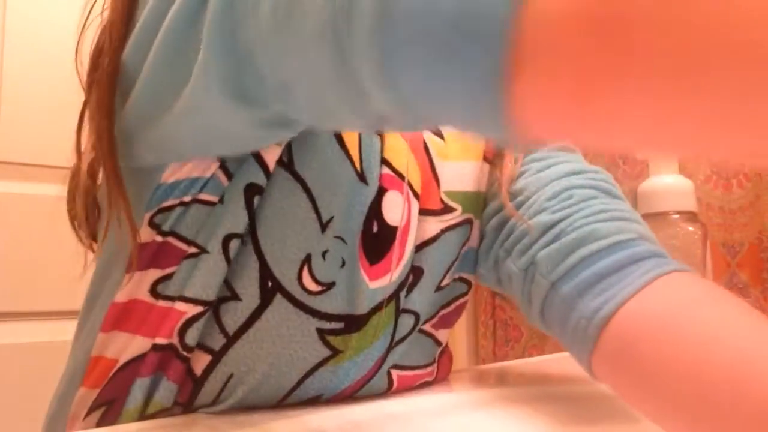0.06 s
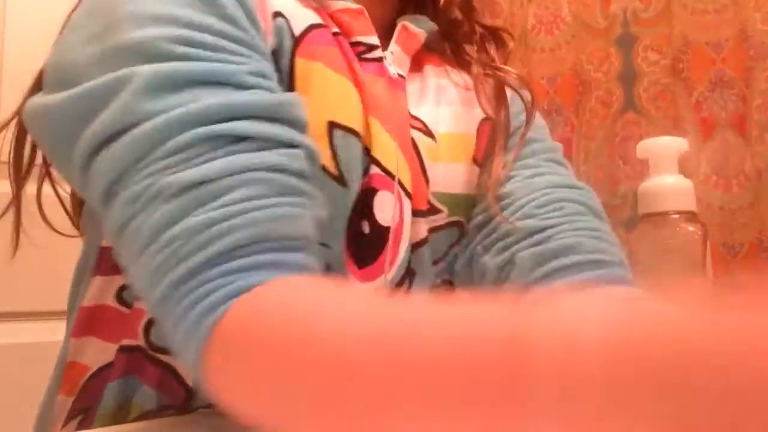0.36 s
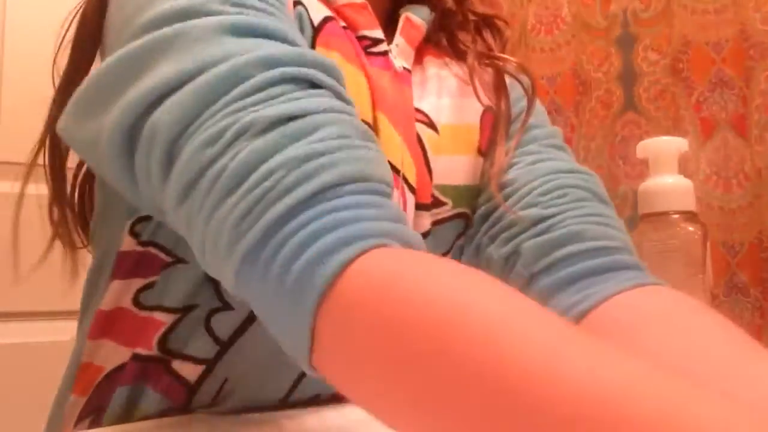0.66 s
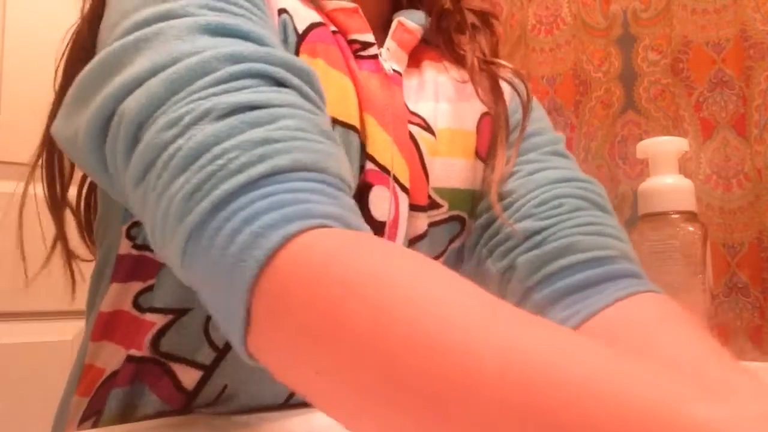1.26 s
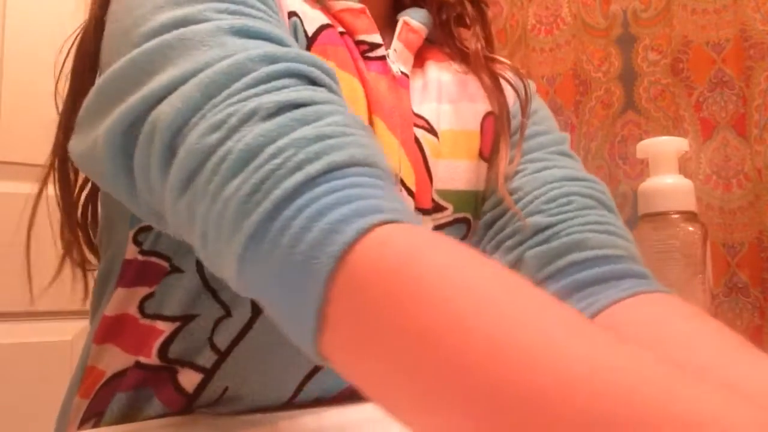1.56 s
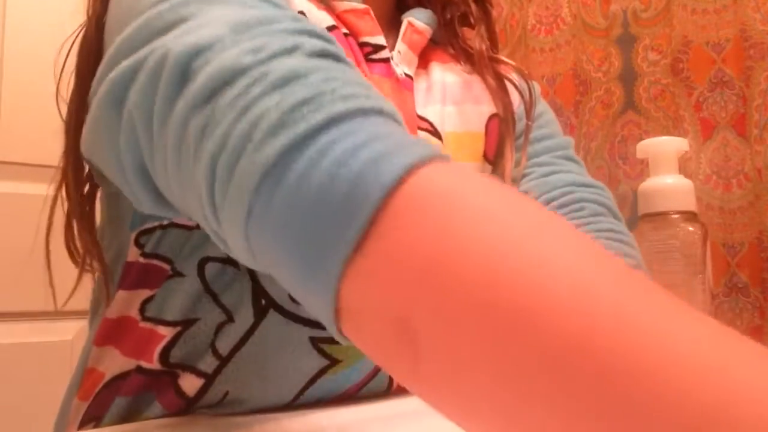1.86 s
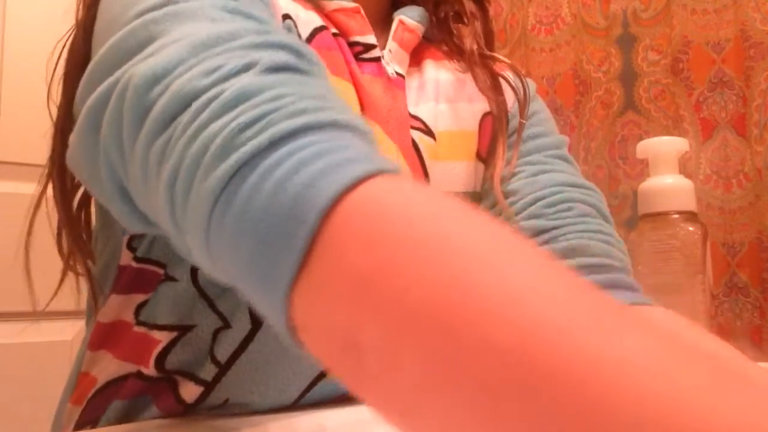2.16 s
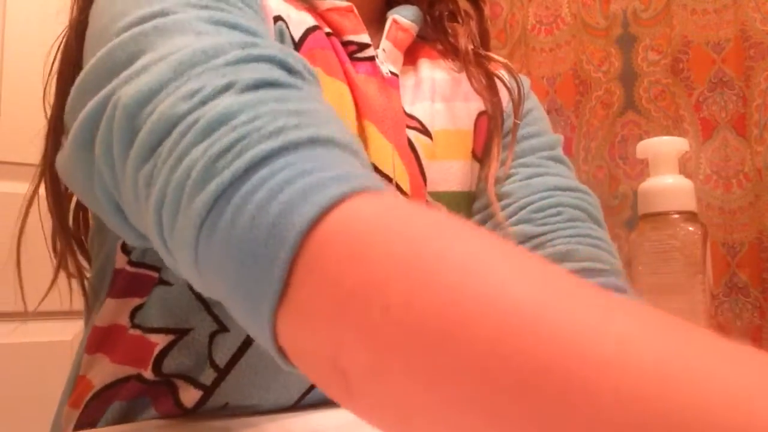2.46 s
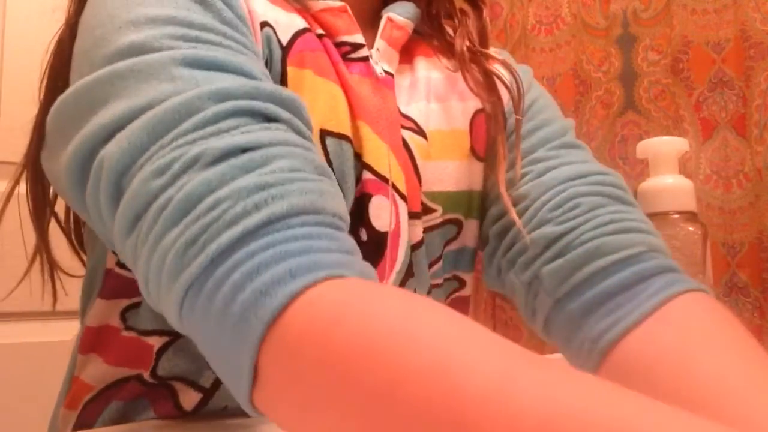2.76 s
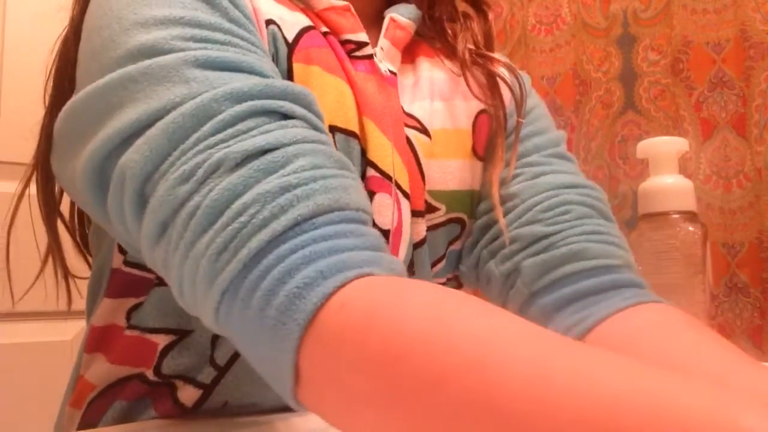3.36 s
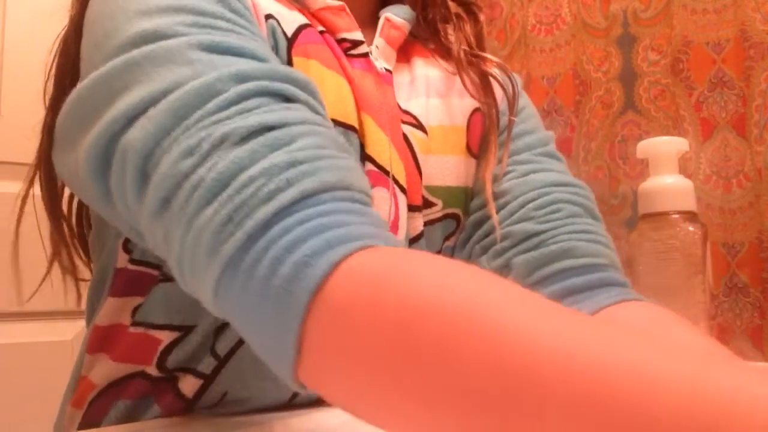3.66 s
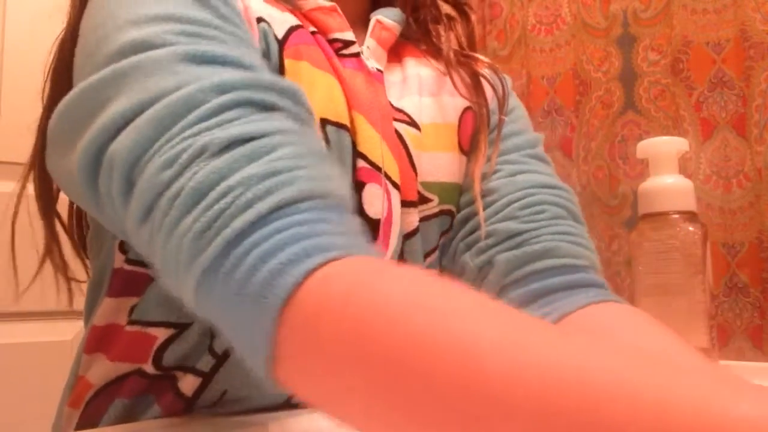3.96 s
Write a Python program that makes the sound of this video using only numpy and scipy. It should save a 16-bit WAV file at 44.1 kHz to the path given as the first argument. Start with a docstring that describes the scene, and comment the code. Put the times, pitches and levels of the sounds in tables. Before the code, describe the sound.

Water runs steadily from a tap into a sink, splashing off rinsing hands.

```python
"""Rinsing hands under a tap.

An aerated jet hisses and fizzes steadily into a bathroom sink. The water drums on the basin,
stirs hollow resonances in the bowl and gurgles at the drain; small bubbles ring. The hands throw
spray, brief spurts and splashes, and dump water that thuds. A small hard room, heard in mono."""
import sys
import numpy as np
from scipy import signal
from scipy.fft import rfft, irfft
from scipy.io import wavfile

SR = 44100
rng = np.random.default_rng(int(sys.argv[2]) if len(sys.argv) > 2 else 0)


def transcribe(signal):
    """Save signal, clipped to [-1, 1], as a 16-bit WAV file at the path in sys.argv[1]."""
    frames = np.atleast_2d(signal).T
    limited = np.clip(frames, -1, 1)
    pcm = np.round(limited * 32767).astype(np.int16)
    wavfile.write(sys.argv[1], SR, pcm)


N = 176400
T = np.arange(N) / SR
HZ = np.maximum(np.fft.rfftfreq(N, 1 / SR), 1)


def from_db(db):
    """Decibels to gain."""
    return 10 ** (np.asarray(db) / 20)


def unit_rms(x):
    """Scale to rms 1."""
    return x / np.sqrt(np.mean(x ** 2) + 1e-20)


def level(rows):
    """Gain curve from (time [s], level [dB]) points."""
    return from_db(np.interp(T, *np.transpose(rows)))


def colour(x, spectrum):
    """Apply a spectrum, falling 12 dB/octave below its first point; rms 1."""
    hz, db = np.transpose(spectrum)
    gain = from_db(np.interp(np.log(HZ), np.log(hz), db)) * np.minimum(HZ / hz[0], 1) ** 2
    return unit_rms(irfft(rfft(x) * gain, N))


def drift(rate_hz):
    """Slow random wander; rms 1."""
    return unit_rms(irfft(rfft(rng.standard_normal(N)) / (1 + (HZ / rate_hz) ** 2), N))


def patter(per_s, spread_db):
    """Random impacts of uneven size; rms 1."""
    sizes = from_db(spread_db * np.minimum(rng.exponential(1, N), 5)) * rng.choice([-1, 1], N)
    return unit_rms(sizes * (rng.random(N) < per_s / SR)) + 1e-18


def resonate(x, hz, width_hz):
    """Two-pole resonance; rms 1."""
    r = np.exp(-np.pi * width_hz / SR)
    return unit_rms(signal.lfilter([1, 0, -1], [1, -2 * r * np.cos(2 * np.pi * hz / SR), r * r], x))


def envelope(start_s, attack_s, hold_s, release_s):
    """Linear rise, hold, exponential fall."""
    rise = np.clip((T - start_s) / attack_s, 0, 1)
    return rise * np.exp(-np.maximum(T - start_s - attack_s - hold_s, 0) / release_s)


def high_pass(x, hz, order):
    """Butterworth low cut."""
    return signal.sosfilt(signal.butter(order, hz, "high", fs=SR, output="sos"), x)


def bathroom(x, t60_s=.3, wet_db=-10):
    """Direct sound plus the short dense tail of a hard room."""
    t = T[:SR // 2]
    tail = rng.standard_normal(len(t)) * from_db(-60 * t / t60_s) * (t > .003)
    wet = signal.fftconvolve(x, tail / np.linalg.norm(tail))[:N]
    return (x + from_db(wet_db) * wet) / np.hypot(1, from_db(wet_db))


# Room noise spectrum: (frequency [Hz], relative density [dB])
WASH_SPECTRUM = [(25, -46), (45, -32), (65, -13), (100, -14), (135, 2), (300, -4), (650, -2),
                 (1000, 3.5), (2000, -15.5)]

def room_wash(level_db=-54.5):
    """Steady low noise of the room."""
    return from_db(level_db) * colour(rng.standard_normal(N), WASH_SPECTRUM)


def faint_tone(hz=527, level_db=-46):
    """One brief tone near the start."""
    gain = from_db(level_db) * envelope(start_s=.16, attack_s=.035, hold_s=.085, release_s=.03)
    return gain * np.sin(2 * np.pi * hz * T)


# Force of the stream on the basin: (time [s], level [dB])
DRUM_LEVEL = [(0, -47.5), (.14, -52.5), (.3, -49.5), (.6, -52), (1.1, -50), (1.4, -52), (1.75, -45),
              (1.92, -54), (2.04, -44), (2.25, -47), (2.6, -43.5), (2.85, -47), (3.0, -50.5), (3.15, -47),
              (3.4, -53), (3.6, -47.5), (3.8, -49), (4, -50)]
# Water dumped from the hands: (start [s], hold [s], centre [Hz], spread [octaves], level [dB])
THUDS = [(1.683, .01, 260, 1.0, -50), (2.311, 0.066, 338, 1, -39), (2.473, 0.056, 440, 1.5, -40),
         (3.055, .05, 216, 0.22, -41), (3.674, .006, 330, 1.2, -43)]
# Basin modes: (frequency [Hz], width [Hz], relative stream gain [dB], relative thud gain [dB])
BASIN_MODES = [(133, 25, -9.5, -22), (177, 16, -7.5, -7), (212, 16, -8, 0), (244.6, 12, -1, -5),
               (313, 23, -2, -4), (358.6, 26, -5.5, -2.5), (426.5, 24, -6, -4), (498, 20, -7.5, -21),
               (533.3, 14, -7.5, -18), (575.5, 25, -5.5, 2), (648, 44, -10, -11)]

def basin():
    """The stream drums on the basin's modes; a handful of water swells those around one pitch."""
    stream, out = level(DRUM_LEVEL), 0
    thuds = [(centre_hz, octaves, from_db(db) * envelope(start_s, .005, hold_s, .018))
             for start_s, hold_s, centre_hz, octaves, db in THUDS]
    for hz, width_hz, stream_db, thud_db in BASIN_MODES:
        swell = sum(force / (1 + (np.log2(hz / centre_hz) / octaves) ** 2)
                    for centre_hz, octaves, force in thuds)
        ringing = resonate(patter(per_s=700, spread_db=2.5), hz, width_hz)
        ringing = resonate(ringing, hz, hz / 2)  # steeper skirts
        out += ringing * np.hypot(from_db(stream_db) * stream, from_db(thud_db) * swell) / 2
    return high_pass(out, hz=121.4, order=6)


# Hollow resonances of the bowl: (frequency [Hz], width [Hz], level [dB])
HOLLOW_MODES = [(1069, 25, -54), (1440, 110, -45), (1566, 18, -47), (1698, 25, -54.5), (2680, 330, -54),
                (3183, 13, -52.5), (3770, 65, -43), (3916, 240, -48), (4310, 21, -52)]

def churn(modes=HOLLOW_MODES, waver_db=1.83):
    """Churning water keeps hollow resonances ringing unevenly."""
    out = 0
    for hz, width_hz, db in modes:
        gain = from_db(db + waver_db * drift(rate_hz=14))
        out += gain * resonate(patter(per_s=1400, spread_db=2), hz, width_hz)
    return out


# Flow reaching the drain: (time [s], gain [dB])
DRAIN_FLOW = [(0, -0.5), (1.5, 1.5), (1.9, -5.5), (2.35, -4.5), (2.8, 4.5), (3.15, -0.5), (4, 2)]
# Air modes of the drain: (frequency [Hz], width [Hz], level [dB])
DRAIN_MODES = [(1963, 117, -42), (2057, 37, -43.5)]

def drain():
    """Water stirs the air in the drain, less while the hands block the stream."""
    return level(DRAIN_FLOW) * churn(DRAIN_MODES)


def bubbles(per_s=160, low_hz=800, high_hz=4380, base_db=-48.5, spread_db=2.5):
    """Small bubbles ring down while rising in pitch."""
    decay_cycles, rise_per_decay = 12.5, .043
    out, t = np.zeros(N + SR), T[:SR // 10]
    for when, pitch, rank in rng.random((int(per_s * N / SR), 3)):
        hz = low_hz * (high_hz / low_hz) ** pitch
        age, start = t * hz / decay_cycles, int(when * N)
        gain = from_db(base_db - spread_db * np.log(max(rank, .01))) * np.sqrt(hz / low_hz)
        phase = 2 * np.pi * hz * t * (1 + rise_per_decay * age / 2)
        out[start:start + len(t)] += gain * np.exp(-age) * np.sin(phase)
    return out[:N]


# Water slopping off the hands: (start [s], centre [Hz], level [dB])
SPLASHES = [(.26, 3000, -35), (.61, 1950, -33), (1.68, 800, -50.5), (1.84, 850, -46), (2.09, 1400, -40),
            (3.13, 1520, -39), (3.332, 3670, -32.5), (3.44, 1090, -41.5), (3.546, 2280, -32),
            (3.548, 1130, -37), (3.60, 1410, -38.5), (3.68, 870, -41.5)]

def splashes(edge_ratio=1.42):
    """Each slop is a short cluster of drops around one pitch."""
    out = np.zeros(N)
    for start_s, hz, db in SPLASHES:
        band = signal.butter(2, [hz / edge_ratio, hz * edge_ratio], "band", fs=SR, output="sos")
        drops = unit_rms(signal.sosfilt(band, patter(per_s=2500, spread_db=2)))
        out += from_db(db) * envelope(start_s, attack_s=.0019, hold_s=.016, release_s=.012) * drops
    return out


# Broad resonances of the bowl: (frequency [Hz], width [Hz], lift [dB])
BOWL_LIFTS = [(3880, 240, 1.0), (5200, 410, 2.5), (6010, 380, 2.5), (7060, 170, 2.5), (8650, 220, 1.5),
              (9500, 340, 0.5), (11220, 330, 3), (14700, 2200, 5)]

def bowl(x):
    """The bowl lifts a few treble bands."""
    gain = 1 + sum((from_db(db) - 1) / (1 + (2 * (HZ - hz) / width_hz) ** 2)
                   for hz, width_hz, db in BOWL_LIFTS)
    return irfft(rfft(x) * gain, N)


# Deflections of the jet: (start [s], hold [s], level [dB])
SPURTS = [(1.654, .04, -28), (1.769, 0.017, -28), (1.81, 0.042, -18.5), (1.872, 0.009, -26),
          (1.947, 0.17, -29)]
# Spurt spectrum: (frequency [Hz], relative density [dB])
SPURT_SPECTRUM = [(4000, -61), (6500, -9), (8000, -3.5), (9100, 3), (11500, -4), (13000, -12), (15500, -11)]

def spurts(attack_s=.01, release_s=.014):
    """The jet glances off a hand in bright bursts of noise."""
    force = sum(from_db(db) * envelope(start_s, attack_s, hold_s, release_s)
                for start_s, hold_s, db in SPURTS)
    return force * colour(rng.standard_normal(N), SPURT_SPECTRUM)


# Amount of spray: (time [s], level [dB])
SPRAY_LEVEL = [(0, -38), (.7, -41), (1.2, -38.5), (1.5, -34), (1.8, -32.5), (1.93, -34.5), (2.1, -29),
               (2.38, -31.5), (2.6, -31.5), (2.85, -49), (3.12, -84), (3.25, -29), (3.36, -36), (3.45, -47),
               (3.58, -39), (3.8, -50), (4, -57)]
# Droplet spectrum: (frequency [Hz], relative density [dB])
SPRAY_SPECTRUM = [(2500, -27), (3400, -8.5), (3800, -4.5), (4550, -3.5), (5250, -0.5), (5600, -0.5),
                  (6000, 3), (6600, -5), (7800, -2.5), (9200, -1), (11000, -28), (15000, -60)]

def spray():
    """Patter of fine droplets thrown off the hands."""
    return level(SPRAY_LEVEL) * colour(patter(per_s=3500, spread_db=2), SPRAY_SPECTRUM)


# Strength of the jet: (time [s], relative level [dB])
JET_LEVEL = [(0, -24), (.7, -24), (1.5, -25), (1.75, -25.5), (1.9, -24), (2.7, -24.5), (4, -25)]
# Hiss spectrum: (frequency [Hz], relative density [dB])
JET_SPECTRUM = [(410, -48), (700, -23.5), (816, -20.5), (977, -17), (1040, -16.5), (1140, -15.5),
                (1300, -6.5), (1530, -9.5), (1760, -6.5), (2000, -3.5), (2110, -7.5), (2280, -10),
                (2560, -3), (2800, -6), (3350, -8), (3800, -4), (4550, -7), (5880, -4), (7510, -4.5),
                (9450, 2), (10500, 0), (11300, 2.5), (15000, -2.5)]

def jet(gain_db=2.33, fizz_db=-3, flicker_db=1.06):
    """The aerated stream hisses and its tiny bubbles burst; each band flickers on its own."""
    noise = rng.standard_normal(N)
    fizz = from_db(fizz_db) * patter(per_s=12000, spread_db=2.7)
    spectrum = rfft(noise + fizz)
    band = np.floor(2 * np.log2(np.maximum(HZ / 1000, 1)))  # half octaves above 1 kHz
    hiss = sum(irfft(spectrum * (band == k), N) * from_db(flicker_db * drift(rate_hz=25))
               for k in np.unique(band))
    return from_db(gain_db) * level(JET_LEVEL) * colour(hiss, JET_SPECTRUM)


def scene():
    """Water and room, the same in both channels."""
    hiss = bowl(bathroom(jet() + spray() + spurts()))
    gurgle = high_pass(bathroom(bubbles()) + splashes() + churn() + drain(), hz=400, order=3)
    mono = hiss + gurgle + basin() + faint_tone() + room_wash()
    return np.array([mono, mono])


def record(dry):
    """Steep treble cut."""
    cutoff_hz, transition_hz = 15300, 120
    return irfft(rfft(dry) * np.clip((cutoff_hz - HZ) / transition_hz + .5, 0, 1), N)


dry = scene()
out = record(dry)
transcribe(out)
```